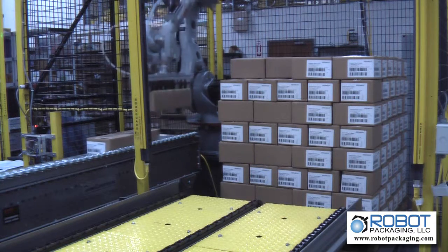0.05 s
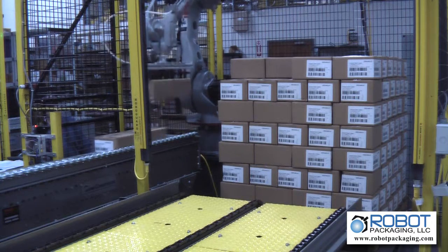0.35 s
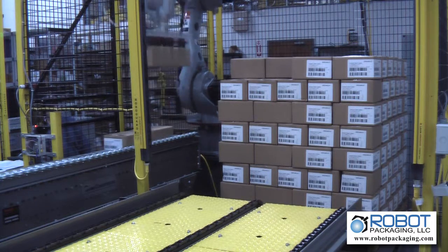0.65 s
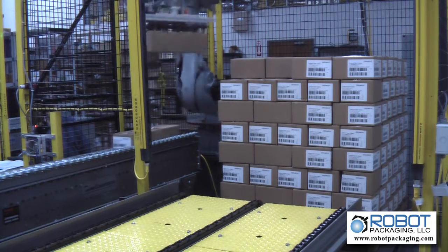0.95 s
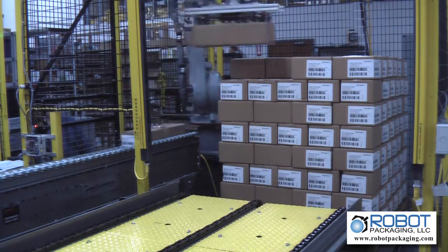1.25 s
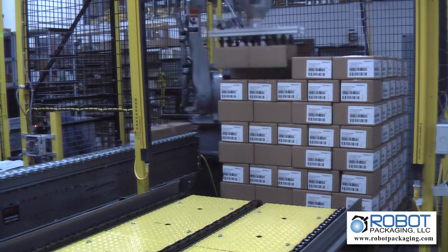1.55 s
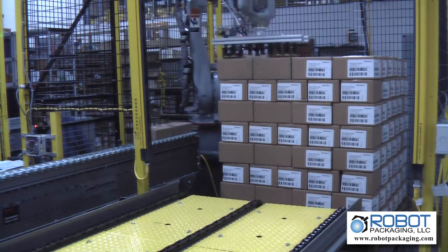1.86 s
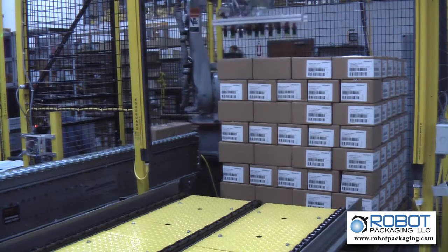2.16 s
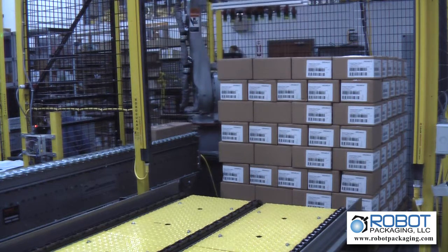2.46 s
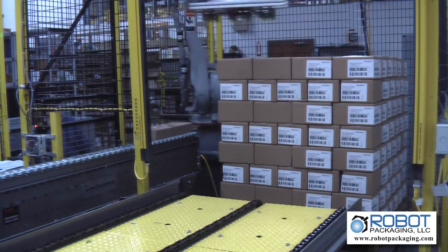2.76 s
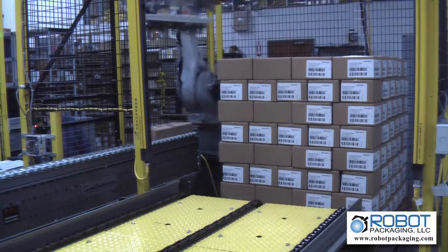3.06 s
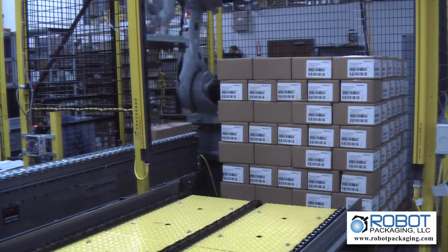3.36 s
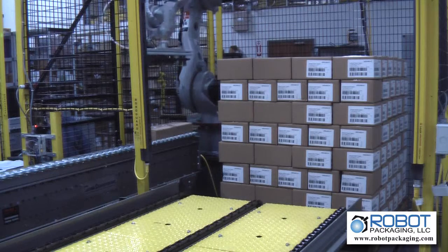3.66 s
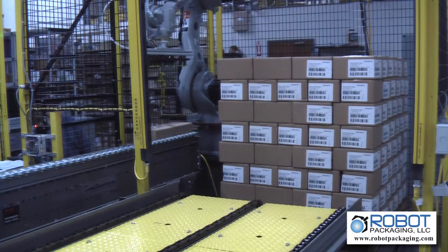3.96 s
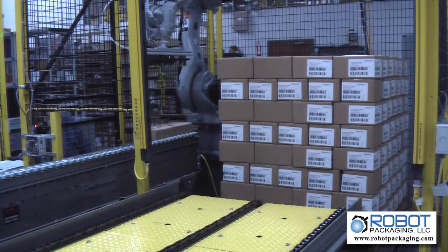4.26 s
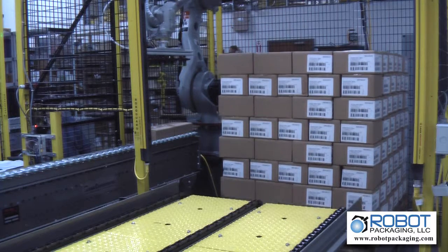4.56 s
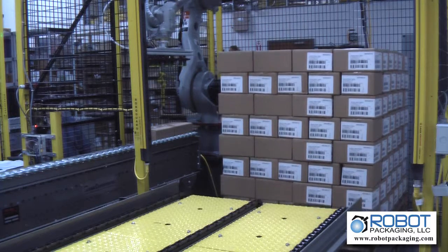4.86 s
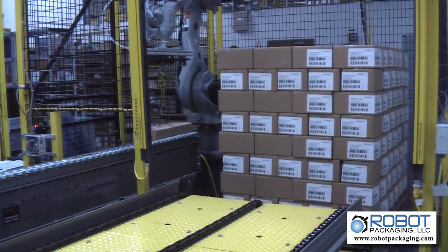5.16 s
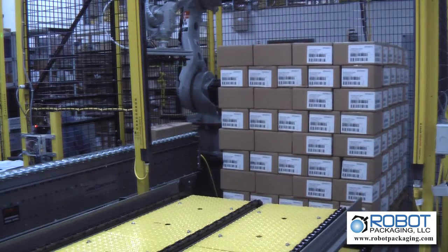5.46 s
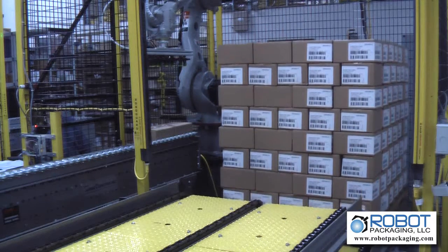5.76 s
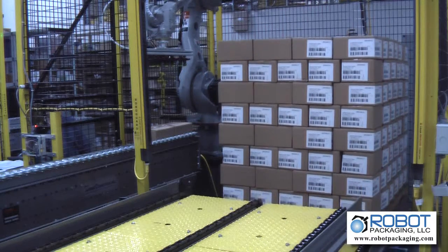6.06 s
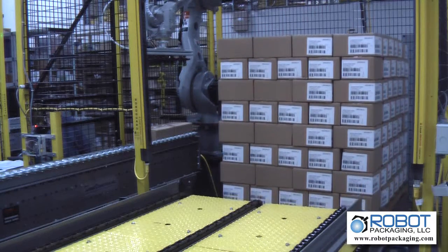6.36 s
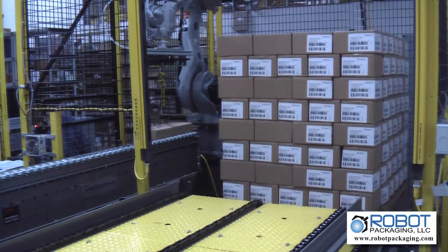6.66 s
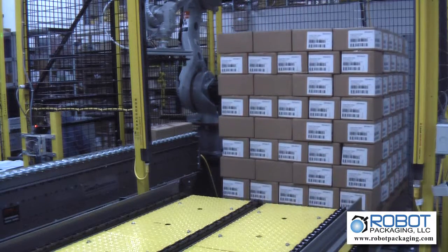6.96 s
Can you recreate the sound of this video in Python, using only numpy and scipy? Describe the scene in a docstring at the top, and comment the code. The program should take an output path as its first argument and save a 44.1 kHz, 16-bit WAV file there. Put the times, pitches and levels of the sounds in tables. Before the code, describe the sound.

A pump drones steadily in a factory hall, with motors, fans and conveyors behind it. A robot arm swings with a gear whirr and servo whine while its suction gripper hisses faintly. At about two seconds, a short burst of air comes with the dull knock of a box landing. The arm whirrs back and stops with a light clack, leaving air seeping faintly. Everything is heard from across the hall.

```python
"""A palletizing robot, heard across a factory hall, swings a box onto the stack: gears sing, servos whine.
Its suction gripper hisses while it holds the box and blows off a burst of air as the box knocks down;
the arm whirrs back to wait and a valve leaves air seeping. Under it all throb the pressure pulses of a
pump, with motors, fans and conveyors in the background. The recorder's gain control lets the drone sink
whenever hiss or whirr swells. The left channel is slightly quieter, with almost no treble above 9 kHz."""
import sys
import numpy as np
from scipy import signal
from scipy.fft import rfft, irfft, next_fast_len
from scipy.io import wavfile

SR = 44100
rng = np.random.default_rng(int(sys.argv[2]) if len(sys.argv) > 2 else 0)


def persist_wave(psi):
    """Save psi, clipped to +-1, as 16-bit WAV."""
    counts = np.round(np.clip(psi, -1, 1) * 32767).astype(np.int16)
    wavfile.write(sys.argv[1], SR, np.atleast_2d(counts).T)


N = 309582
TIME = np.arange(N) / SR

# The arm's moves: lift, swing to the stack, lower, rise clear, swing back, fold in, brake, sink.
# top speed at t/s, run-up/s, run-down/s, relative top speed, gear note f/Hz, relative level/dB,
# upper note against it/dB
ARM_MOVES = [(0.551, 0.48, 0.73, 0.22, 328, -50, -1), (1.225, 0.12, 0.12, 0.9, 614, -32, 3),
             (1.37, 0.13, 0.18, 0.55, 562, -35, 1), (2.62, 0.26, 0.22, 0.36, 708, -32, -18),
             (3.06, 0.18, 0.13, 0.79, 770, -36, -1), (3.17, 0.12, 0.15, 0.85, 797, -33, 0),
             (3.389, 0.15, 0.21, 0.55, 408, -33, -3), (4.0, 0.98, 0.52, 0.31, 297, -56, -1)]
# A gear's mesh tone and its two overtones: relative level/dB
MESH_HARMONICS = [0, -7, -13]


def gear_notes(sag=0.3, swell=2.3, upper_ratio=1.36, rough_db=-7, direct_db=2.0, hall_db=-1.5):
    """Two geared joints sing higher and louder with speed, reaching the microphone direct and by echo."""
    notes = 0
    for peak_s, run_up, run_down, _, top_hz, top_db, upper_db in ARM_MOVES:
        share = stroke(peak_s, run_up, run_down)
        turns = np.cumsum(top_hz * (1 - sag * (1 - share))) / SR + rng.random()
        pair = sum(from_db(joint_db + mesh_db) * tone(k * ratio * turns)
                   for ratio, joint_db in ((1, 0), (upper_ratio, upper_db))
                   for k, mesh_db in enumerate(MESH_HARMONICS, 1))
        roughness = 1 + from_db(rough_db) * drift(24)
        notes += from_db(top_db) * share ** swell * pair * roughness
    return from_db(direct_db) * notes + from_db(hall_db) * reverberate(notes)


# Whirr of the arm's gears, out on the hall floor: f/Hz, relative level/dB
GEAR_SPECTRUM = [(300, -54), (420, -50.5), (700, -52), (1050, -53.5), (1200, -59), (1370, -57),
                 (1520, -52.5), (1720, -52), (1950, -54.5), (2200, -58), (2400, -63.5), (2700, -59),
                 (3300, -59), (4200, -60), (5500, -72), (8000, -75)]


def gear_whirr(speed, gain_db=1.0, grind_db=1.5):
    """Meshing teeth make a grinding noise that grows with the arm's speed."""
    return speed * from_db(gain_db + grind_db * drift(30)) * hall_noise(GEAR_SPECTRUM, direct=0.76)


# Servo whine at one, two and three times the switching tone: relative level/dB
SERVO_HARMONICS = [-42, -50, -45.5]


def servos(speed, switching_hz=3880, sideband_hz=300, blur_hz=55, strain_hz=3760, strain_db=-27.5):
    """The drives sing in pairs of tones that part with speed; one whines as it slows the loaded swing."""
    whine = sum(from_db(db) * narrow_noise(k * switching_hz + side * sideband_hz * speed, k * blur_hz)
                for k, db in enumerate(SERVO_HARMONICS, 1) for side in (-1, 1))
    slowing = stroke(peak_s=1.32, run_up=0.085, run_down=0.085)
    strain = from_db(strain_db) * slowing * narrow_noise(strain_hz, blur_hz)
    return speed * whine + reverberate(strain)


RELEASE_S, AIR_FLUTTER_DB = 1.955, 1.06  # the gripper lets go; turbulence shakes each jet's level
# Suction jet at the gripper, heard mostly off the walls: f/Hz, relative level/dB
SUCTION_SPECTRUM = [(1200, -63), (2000, -62.5), (2600, -68.5), (3500, -61), (4200, -55.5), (4800, -61.5),
                    (6000, -68), (7200, -75), (9300, -69), (11000, -75.5), (12800, -71.5), (14200, -64.5),
                    (15400, -55.5), (15900, -62)]


def suction(gain_db=-0.56):
    """A turbulent jet hisses for as long as the gripper holds the box."""
    flow = valve(-1, RELEASE_S) * from_db(gain_db + AIR_FLUTTER_DB * drift(26))
    return flow * hall_noise(SUCTION_SPECTRUM, direct=0.39)


# Blow-off over the stack, its roar and its high sizzle: f/Hz, relative level/dB
ROAR_SPECTRUM = [(700, -61), (1300, -59), (2300, -60), (2900, -56.5), (4100, -59), (4700, -64.5),
                 (5800, -65.5), (7000, -74.5), (8800, -84)]
SIZZLE_SPECTRUM = [(8800, -69.5), (9800, -62), (10600, -63), (11300, -61.5), (12600, -62.5), (13900, -72.5),
                   (15500, -75)]


def blow_off(length_s=0.305, peak_s=2.09, roar_lag_s=0.02, roar_db=5.5, sizzle_db=2.0,
             lip_hz=2850, lip_rise_hz_per_s=2100, lip_db=-27):
    """Air frees the box, fullest as the cups come away; their lips ring higher as they peel off."""
    roar_s, shuts_s = RELEASE_S + roar_lag_s, RELEASE_S + length_s
    blown_s = np.clip(TIME, RELEASE_S, shuts_s)
    off_peak_s = np.abs(blown_s - peak_s)
    lip_tone = narrow_noise(lip_hz + lip_rise_hz_per_s * (blown_s - roar_s), width_hz=170)
    lips = from_db(lip_db) * reverberate(lip_tone)
    # Either side of the peak the roar sags by 34 dB/s, the sizzle by 10 dB/s.
    roar_flow = valve(roar_s, shuts_s, opening_s=0.014, tail_s=0.3) * from_db(-34 * off_peak_s)
    sizzle_flow = valve(RELEASE_S, shuts_s) * from_db(sizzle_db - 10 * off_peak_s)
    roar = roar_flow * (from_db(roar_db) * hall_noise(ROAR_SPECTRUM, direct=0.41) + lips)
    sizzle = sizzle_flow * hall_noise(SIZZLE_SPECTRUM, direct=0.41)
    return from_db(AIR_FLUTTER_DB * drift(40)) * (roar + sizzle)


# Dull knocks as the box lands, the gripper lifts off and the arm brakes: t/s, level/dB per Hz, f/Hz
DULL_KNOCKS = [(2.0, -54, 95), (2.02, -37.5, 380), (2.265, -39, 390), (3.43, -43, 600)]
# Clacks as the box meets the stack and the arm stops over the conveyor: t/s, level/dB per Hz, f/Hz
HARD_CLACKS = [(2.018, -52.5, 1900), (3.435, -52.5, 2300)]


def impacts():
    """Box and arm come to rest with knocks and clacks, blurred on their way across the hall."""
    knocks = bursts(DULL_KNOCKS, octaves=0.35, decay_s=0.036)
    clacks = bursts(HARD_CLACKS, octaves=0.7, decay_s=0.026, rise_s=0.0072)
    return knocks + clacks


# Broad bursts of noise, heard across the hall: t/s, level/dB per Hz, f/Hz
BROAD_BURSTS = [(2.015, -62, 1890), (4.68, -60, 2830)]


def broad_bursts():
    """A broad 1-3 kHz burst sounds as the box lands, and a brighter one while the arm waits."""
    return bursts(BROAD_BURSTS, octaves=0.83, decay_s=0.05)


# Seeping air, arriving straight at the microphone: f/Hz, relative level/dB
SEEP_SPECTRUM = [(3000, -80), (5300, -70), (7300, -91), (8600, -71), (9500, -82), (11200, -78),
                 (12400, -75), (13500, -83), (15500, -84)]


def seep(start_s=3.42, gain_db=2.0, sag_db_per_s=1):
    """A valve leaves air seeping while the robot waits, weaker as its supply sags."""
    sag_db = sag_db_per_s * np.maximum(TIME - start_s, 0)
    flow = valve(start_s, np.inf) * from_db(gain_db - sag_db + AIR_FLUTTER_DB * drift(14))
    return flow * hall_noise(SEEP_SPECTRUM, direct=2.8)


SHAFT_HZ = 28.15
# Pump drone under the robot, half orders from a two-turn cycle: multiple of SHAFT_HZ, relative level/dB
DRONE_ORDERS = [(2.0, -52.8), (3.0, -50), (5.0, -43), (6.0, -43), (6.5, -45), (7.0, -36.4), (7.5, -34.1),
                (8.0, -26.8), (8.5, -37.7), (9.0, -33), (9.5, -39.5), (10.0, -29.6), (10.5, -40.4),
                (11.0, -21.9), (12.0, -13.6), (12.5, -38.4), (13.0, -37.6), (14.0, -38.8), (14.5, -42.5),
                (16.0, -44), (17.0, -36.5), (18.0, -43.2), (19.0, -27.8), (19.5, -41.5), (20.0, -37),
                (21.0, -40.4), (22.0, -28.5), (23.0, -33.6), (23.5, -43), (24.5, -43), (25.0, -46.5),
                (28.0, -46), (28.5, -46), (31.5, -46), (32.0, -39.3), (32.5, -45), (33.0, -38),
                (34.0, -30.6), (34.5, -45)]


def pump(level_db=-13.5, waver_db=0.23, slip=0.00029, growth_db_per_s=0.9):
    """Pressure pulses of a nearly steady shaft: high orders beat together, low ones merge to a drone."""
    turns = np.cumsum(SHAFT_HZ * (1 + slip * drift(3.1))) / SR + rng.random()
    strongest_db = max(db for _, db in DRONE_ORDERS)
    drone = 0
    for order, db in DRONE_ORDERS:
        # The pipework smears each pulse: orders below 32 trail, those below 10 still more.
        lag_turns = 0.24 * max(32 - order, 0) ** 2 / 2 + 0.06 * max(10 - order, 0) ** 3 / 6
        waver = waver_db * min((strongest_db - db) / 20, 1) * drift(3.6)
        # The top note flutters ever more deeply as the orders just under it grow.
        growth = growth_db_per_s * (TIME - TIME.mean()) if 31.5 <= order <= 33 else 0
        drone += from_db(db - strongest_db + waver + growth) * tone(order * turns + lag_turns)
    return from_db(level_db) * (drone + casing_buzz())


# Buzz at the pump's casing: f/Hz, level/dB per Hz against the strongest order
CASING_SPECTRUM = [(450, -51.5), (620, -52.5), (940, -49), (1080, -48), (1800, -62), (3500, -66.5),
                   (5600, -56.5)]


def casing_buzz(uneven_db=5.0):
    """The casing rattles alike every two turns: a comb of faint orders, each of its own strength."""
    period = round(2 * SR / SHAFT_HZ)
    hz = np.maximum(np.arange(period // 2 + 1) * SHAFT_HZ / 2, 1)
    scatter_db = uneven_db * np.clip(rng.standard_normal(len(hz)), -2, 1)
    strength = colour(CASING_SPECTRUM, hz) * from_db(scatter_db)
    phases = np.exp(2j * np.pi * rng.random(len(hz)))
    cycle = irfft(strength * phases, period) * np.sqrt(period * SR / 2)
    return np.resize(cycle, N)


# Hums of other motors in the hall: f/Hz, relative level/dB
MOTOR_HUMS = [(73.3, -46), (119.9, -41.5), (154.8, -48), (258.4, -42.5), (416, -54), (516.8, -40.5),
              (523.5, -42)]
# Thin, rough whines of the running machinery: f/Hz, width/Hz, relative level/dB
MACHINE_WHINES = [(1195, 12, -44.5), (1470, 16, -44.4), (1660, 20, -47), (2085, 30, -46), (2300, 16, -40.5),
                  (2470, 16, -46.5), (2560, 25, -48), (2650, 16, -46), (2865, 55, -38.5), (3025, 14, -41.0),
                  (3160, 25, -45), (3225, 25, -45.5), (3370, 30, -42.5), (3500, 30, -43.8),
                  (3650, 30, -42.8), (3895, 25, -43.5), (4070, 16, -45.5), (4590, 16, -47.3),
                  (4830, 25, -47.5)]


def motors(hum_db=-1.5, whine_db=2.6, waver_db=2.0):
    """Other machines hum and whine in the background, fading in and out a little."""
    hums = sum(from_db(db + waver_db * drift(8.2)) * tone(hz * TIME + rng.random())
               for hz, db in MOTOR_HUMS)
    whines = sum(from_db(db) * narrow_noise(hz, width / 2) for hz, width, db in MACHINE_WHINES)
    return from_db(hum_db) * hums + from_db(whine_db) * whines


# Room tone all around the microphone, rumble and hiss: f/Hz, relative level/dB
RUMBLE_SPECTRUM = [(25, -71), (60, -74), (105, -67), (170, -58.5), (215, -53.5), (260, -50), (340, -53.5),
                   (420, -60.5), (510, -55), (600, -54), (680, -56.5), (780, -61.5), (930, -60),
                   (1150, -68)]
HISS_SPECTRUM = [(1100, -63.5), (1500, -62.5), (1850, -63), (2250, -61), (2550, -65.5), (2900, -61),
                 (3600, -62), (4500, -64), (5550, -65), (5900, -69.5), (6400, -70.5), (7300, -93.5),
                 (9400, -69.5), (12000, -82), (15500, -79)]


def room_tone(rumble_db=0.8, hiss_db=-2.5):
    """Distant fans and conveyors, blurred by the building."""
    rumble = from_db(rumble_db) * hall_noise(RUMBLE_SPECTRUM)
    return rumble + from_db(hiss_db) * hall_noise(HISS_SPECTRUM, direct=0.62)


# Hall sound at the two sides of the microphone: f/Hz, left-right likeness 0-1
STEREO_LIKENESS = [(60, 0.45), (300, 0.84), (600, 0.83), (1200, 0.48), (3000, 0.56), (8000, 0.62),
                   (15000, 0.51)]


def hall_noise(spectrum, direct=1.0):
    """Stereo noise of a given density; the less direct it arrives, the more the two channels differ."""
    size = next_fast_len(N, real=True)
    hz = np.maximum(np.arange(size // 2 + 1) * SR / size, 1)
    right, other = rfft(rng.standard_normal((2, size)))
    alike = np.clip(direct * at_hz(STEREO_LIKENESS, hz), 0, 1)
    left = alike * right + np.sqrt(1 - alike ** 2) * other
    return irfft(np.array([left, right]) * colour(spectrum, hz) * np.sqrt(SR / 2), size)[:, :N]


def reverberate(x, t60_s=0.47, direct=0.73):
    """A sound heard across the hall: dense dying reflections, in stereo, at unchanged power."""
    t = TIME[:SR // 2]
    echoes = hall_noise([(100, 0.019), (6000, 0)], direct)[:, :len(t)] * from_db(-60 * t / t60_s)
    gain = np.sqrt(np.mean(np.abs(rfft(echoes, SR)[:, 200:5000]) ** 2))
    return signal.fftconvolve(x[None], echoes / gain, axes=1)[:, :N]


def bursts(rows, octaves, decay_s, rise_s=0.0092):
    """Heard through the hall, each short sound is a hump of noise that swells quickly and dies away."""
    out = 0
    for peak_s, db, hz in rows:
        hump = [(hz * 2 ** (k * octaves), db - 4 * k * k) for k in range(-2, 3)]
        rise = np.clip((TIME - peak_s) / rise_s + 1, 0, 1)
        decay = np.exp(-np.maximum(TIME - peak_s, 0) / decay_s)
        out += rise * decay * hall_noise(hump, direct=0.18)
    return out


def valve(opens_s, closes_s, opening_s=0.034, decay_s=0.047, tail_s=0.092, tail_db=-6):
    """Air flow 0-1: it rises as the valve opens and drops when it shuts, leaving a tail in the hall."""
    shut_s = np.maximum(TIME - closes_s, 0)
    fall = np.maximum(np.exp(-shut_s / decay_s), from_db(tail_db) * np.exp(-shut_s / tail_s))
    return np.clip((TIME - opens_s) / opening_s, 0, 1) * fall


def stroke(peak_s, run_up, run_down, rounding=1.6):
    """Share of top speed during one move; a rounding of 1 gives a pointed peak, 2 a bell."""
    ramp_s = np.where(TIME < peak_s, run_up, run_down)
    return np.exp(-np.minimum(np.abs((TIME - peak_s) / ramp_s) ** rounding, 20))


def narrow_noise(hz, width_hz):
    """A tone of rms 1 whose strength and phase scatter over a given width."""
    turns = np.cumsum(hz * np.ones(N)) / SR
    angle = 2 * np.pi * (turns % 1)
    return drift(2 * width_hz) * np.cos(angle) + drift(2 * width_hz) * np.sin(angle)


def tone(turns):
    """A sine of rms 1 along a phase in turns."""
    return np.sqrt(2) * np.cos(2 * np.pi * (turns % 1).astype(np.float32))


def drift(rate):
    """A smooth random curve of spread 1 that changes about rate times a second."""
    hz = np.arange(2049) * SR / N
    coarse = irfft(rfft(rng.standard_normal(4096)) / (1 + (2 * hz / rate) ** 6))
    return np.interp(TIME, np.linspace(0, TIME[-1], len(coarse)), coarse / coarse.std())


def colour(spectrum, hz, skirt_db=30):
    """Gain of a spectrum table, falling by skirt_db an octave beyond its ends."""
    octaves_outside = np.abs(np.log2(hz / np.clip(hz, spectrum[0][0], spectrum[-1][0])))
    return from_db(at_hz(spectrum, hz) - skirt_db * octaves_outside)


def at_hz(points, hz):
    """A table of f/Hz and value, read on a log-frequency axis."""
    knots, values = np.transpose(points)
    return np.interp(np.log(hz), np.log(knots), values)


def from_db(db):
    """Decibels to gain."""
    return 10 ** (np.asarray(db) / 20)


def scene():
    """The hall from where the microphone stands: the robot at work among the steady machines."""
    speed = np.sqrt(sum((top * stroke(peak_s, up, down)) ** 2 for peak_s, up, down, top, *_ in ARM_MOVES))
    arm = gear_notes() + gear_whirr(speed) + servos(speed)
    gripper = suction() + blow_off()
    return arm + gripper + impacts() + broad_bursts() + seep() + pump() + motors() + room_tone()


def gain_control(x, treble_hz=3410, threshold_db=-29, share=0.31, response_s=0.023):
    """The recorder takes back a share of every dB by which the treble passes the threshold."""
    treble = signal.sosfilt(signal.butter(2, treble_hz, "high", fs=SR, output="sos"), x)
    power = np.mean(treble ** 2, axis=0)
    keep = np.exp(-1 / (response_s * SR))
    smoothed, _ = signal.lfilter([1 - keep], [1, -keep], power, zi=[power[:SR // 10].mean()])
    excess_db = np.maximum(10 * np.log10(smoothed) - threshold_db, 0)
    return x * from_db(-share * excess_db)


# Left channel's tone, slightly quieter, with almost no treble above 9 kHz: f/Hz, level/dB
LEFT_TONE = [(80, 3), (200, -2.5), (350, -3.5), (650, -5.5), (1200, -3), (2400, -4.5), (4400, -7.5),
             (5600, -7.5), (7500, -1.5), (8900, -3), (9600, -22), (12000, -19), (15500, -25)]


def record(dry, phase_turn_hz=536, cutoff_hz=15800):
    """Gain control rides the level, the left channel is duller and turns in phase, and the top is cut."""
    size = next_fast_len(N + SR // 10, real=True)
    hz = np.maximum(np.arange(size // 2 + 1) * SR / size, 1)
    left, right = rfft(gain_control(dry), size)
    all_pass = (phase_turn_hz - 1j * hz) / (phase_turn_hz + 1j * hz)
    left = left * from_db(at_hz(LEFT_TONE, hz)) * all_pass
    low_pass = np.clip((cutoff_hz - hz) / 200 + .5, 0, 1)
    return irfft(np.array([left, right]) * low_pass, size)[:, :N]


dry = scene()
out = record(dry)
persist_wave(out)
```